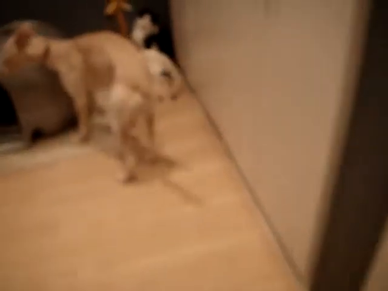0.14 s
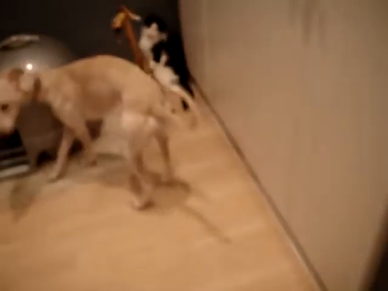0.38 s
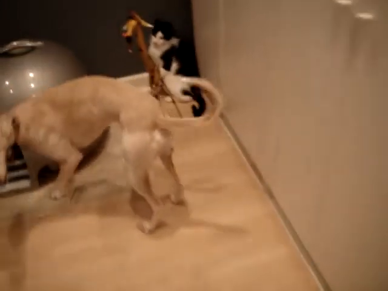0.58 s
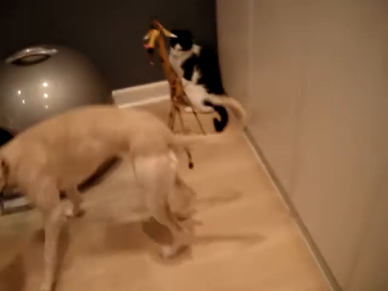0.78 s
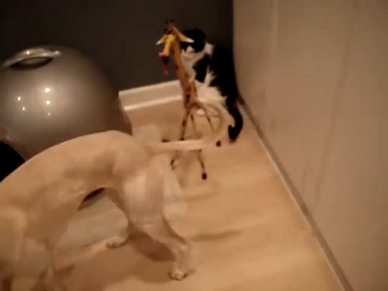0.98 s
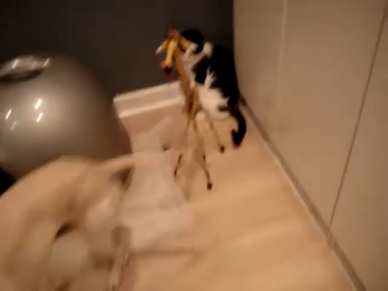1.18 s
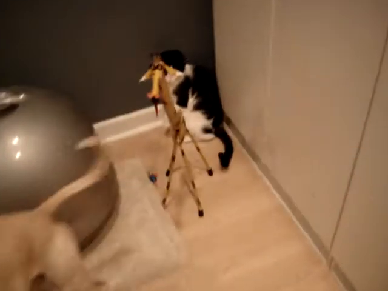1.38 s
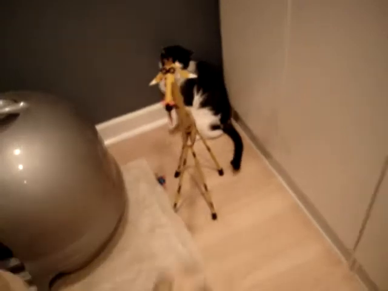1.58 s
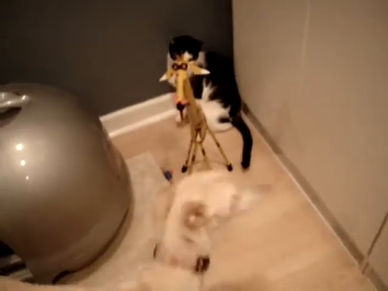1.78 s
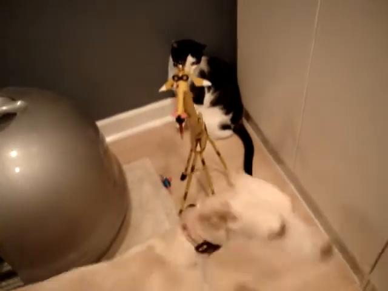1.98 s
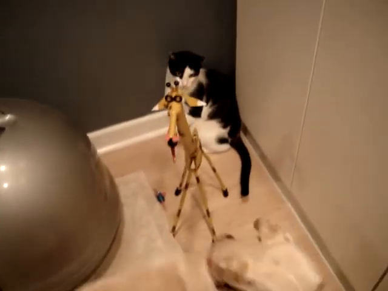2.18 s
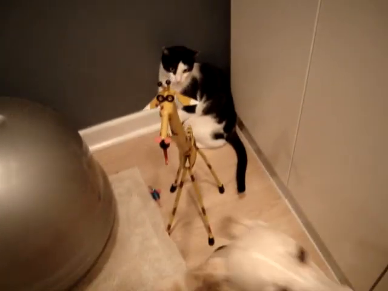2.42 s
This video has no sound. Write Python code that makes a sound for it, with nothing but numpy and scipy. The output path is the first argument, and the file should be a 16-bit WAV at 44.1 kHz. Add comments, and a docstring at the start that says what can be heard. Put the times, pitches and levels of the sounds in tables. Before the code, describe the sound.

Dog claws click sparsely on laminate while a metal collar tag jingles, then scrabble into a louder, dense burst of scrapes, skids and paw thumps before quieting; small, bright room, one microphone, mono.

```python
"""Dogs scrabbling on laminate

Two dogs scrabble round a cat and its toy on a laminate floor in a small, bare room. Claws tick, scrape
and skid in a quick dash, all as runs of stick-slip clicks; pads slap and scuff the same way, duller.
Paws and bodies bump the boards into low damped modes, and a metal collar tag tinkles in high ones.
Faint tones linger, weight shifts rumble, and shaped noise lies beneath as room tone and low rumble.
The contacts and the tag carry the room's short, bright echo."""
import sys
import numpy as np
from scipy import signal
from scipy.fft import rfft, irfft, next_fast_len
from scipy.io import wavfile

SR = 44100
rng = np.random.default_rng(int(sys.argv[2]) if len(sys.argv) > 2 else 0)


def store_pcm(level_fs):
    """Save levels as 16-bit WAV."""
    pcm = np.round(np.clip(level_fs, -1, 1) * 32767).astype(np.int16)
    wavfile.write(sys.argv[1], SR, np.atleast_2d(pcm).T)


N = 108045
TIME = np.arange(N) / SR
CUTOFF_HZ = 10100


def from_db(db):
    """Decibels to gain."""
    return 10 ** (np.asarray(db) / 20)


def rms_one(x):
    """Scale to an rms of 1."""
    return x / np.sqrt(np.mean(x ** 2) + 1e-20)


def at_hz(points, hz):
    """Read a table on a log-frequency axis."""
    table_hz, values = np.array(points).T
    return np.interp(np.log(hz), np.log(table_hz), values)


def level(points):
    """Gain over time from (t/s, level/dB) rows."""
    return from_db(np.interp(TIME, *np.transpose(points)))


def add(out, s, sound):
    """Mix a sound in at a time in seconds."""
    i = max(int(s * SR), 0)
    out[i:i + len(sound)] += sound[:N - i]


def sine(hz, t):
    """A steady tone that starts at a random phase."""
    return np.sin(2 * np.pi * (hz * t + rng.random()))


def colour(x, points, tilt_db=0, ring_hz=5000, ring_db=0, ring_width_hz=220):
    """Causal (minimum-phase) filter of unit power: a spectrum, a tilt per octave and one resonance."""
    size = 2 * next_fast_len(len(x))
    half = size // 2
    hz = np.arange(half + 1) * SR / size + 1e-3
    tilt = tilt_db * np.log2(np.clip(hz / ring_hz, .1, 2))  # flattens an octave above the ring
    ring = ring_db / (1 + ((hz - ring_hz) / ring_width_hz) ** 2)
    top_cut = np.sqrt(1 + (hz / CUTOFF_HZ / 1.1) ** 20)
    gain = rms_one(from_db(at_hz(points, hz) + tilt + ring) / top_cut)
    # folding the cepstrum forward in time keeps pre-ringing off the attacks
    cepstrum = irfft(np.log(gain + 1e-6))
    cepstrum[1:half] *= 2
    cepstrum[half + 1:] = 0
    return irfft(rfft(x, size) * np.exp(rfft(cepstrum)))[:len(x)]


SLIP_SPREAD_DB = 3  # scale of the random boost per slip


def slips(per_s, count, chatter_db, chatter_s):
    """Stick-slip clicks of uneven size, clumped as the grip comes and goes; rms 1."""
    sizes = from_db(SLIP_SPREAD_DB * np.minimum(rng.exponential(1, count), 3.5))
    knots = count // 40
    grip_time = np.arange(count) / SR / max(chatter_s, .001)
    grip = np.interp(grip_time, np.arange(knots), rng.uniform(-1, 1, knots))
    happens = rng.random(count) < per_s / SR
    return rms_one(happens * sizes * from_db(chatter_db * grip) * rng.choice([-1, 1], count))


SLIPS_PER_S, DRAG_FADE_DB = 4500, 11.5
CHATTER_DB, CHATTER_S = 7, 0.0063  # swing of the grip each way, time scale


def drag(attack_s, length_s, size=8192):
    """One contact: a run of slips that sets in, fades and breaks off."""
    t = np.arange(size) / SR
    length_s = max(length_s, .003)
    run = slips(SLIPS_PER_S, size, CHATTER_DB, CHATTER_S)
    run = run * (1 - np.exp(-t / max(attack_s, 1e-4)))
    fade = from_db(-DRAG_FADE_DB * (t / length_s) ** 2)
    break_off = 1 + (t / length_s) ** 10
    # energy grows with length, so a level means the loudness during the contact
    return rms_one(run * fade / break_off) * np.sqrt(length_s * SR / size)


def scrapes(rows, spectrum, ring_width_hz):
    """Each claw or pad lands and drags, with a brightness and a ring of its own."""
    out = np.zeros(N)
    for s, db, attack_s, length_s, tilt_db, ring_hz, ring_db in rows:
        contact = drag(attack_s, length_s)
        add(out, s, from_db(db) * colour(contact, spectrum, tilt_db, ring_hz, ring_db, ring_width_hz))
    return out


def rubs(rows, spectrum, attack_s):
    """Soft runs of slips, all of one colour, from (t/s, level/dB, length/s) rows."""
    out = np.zeros(N)
    for s, db, length_s in rows:
        add(out, s, from_db(db) * drag(attack_s, length_s))
    return colour(out, spectrum)


# Decay of the bare room, longest in the upper mids: f/Hz, t60/s
ROOM_DECAY = [(200, 0.28), (1000, 0.18), (4000, 0.34), (9000, 0.13)]


def room(x, size=26000):
    """A diffuse echo: bands of noise, each dying at its own rate, as one unit-energy response."""
    t, tail = np.arange(size) / SR, 0
    edges = np.geomspace(80, 12000, 9)
    for low, high in zip(edges, edges[1:]):
        band_pass = signal.butter(2, [low, high], "band", fs=SR, output="sos")
        band = signal.sosfilt(band_pass, rng.standard_normal(size))
        tail = tail + band * from_db(-60 * t / at_hz(ROOM_DECAY, np.sqrt(low * high)))
    return signal.fftconvolve(x, rms_one(tail) / np.sqrt(size))[:N]


# Level of the room background: holds fairly even, then drops sharply after 2 s: t/s, level/dB
ROOM_TONE_LEVEL = [(0, -47.5), (0.4, -47), (0.8, -46), (1.25, -46), (1.38, -50.5), (1.6, -48.5),
                   (2.0, -47.5), (2.12, -58), (2.3, -59), (2.45, -60.5)]
# Its spectrum: f/Hz, level/dB
ROOM_TONE_COLOUR = [(25, -0.5), (60, -9.5), (110, -4.5), (170, 0), (250, -2.5), (355, 4.5), (520, -1),
                    (1000, -2), (1750, -5), (2100, -5.5), (2300, -6.5), (2530, -5.5), (2800, -10.5),
                    (6000, -5.5), (10000, -13.5)]


def room_tone():
    """Noise with the room's spectrum, fairly even in level until it drops sharply after 2 s."""
    return level(ROOM_TONE_LEVEL) * colour(rng.standard_normal(N), ROOM_TONE_COLOUR)


FLOOR_RUMBLE_DB = -68.5
# Spectrum of the low rumble, shared with the weight shifts below: f/Hz, level/dB
LOW_COLOUR = [(15, -1.5), (32, -7.5), (70, -12), (150, -22.5), (500, -48)]


def floor_rumble():
    """Constant low rumble of the building, as dark noise."""
    return from_db(FLOOR_RUMBLE_DB) * colour(rng.standard_normal(N), LOW_COLOUR)


# Weight shifting on the floor: t/s, level/dB, length/s
WEIGHT_SHIFTS = [(0.175, -55, 0.071), (0.74, -52.5, 0.085), (1.35, -50, 0.025), (1.52, -53.5, .045)]


def weight_shifts():
    """Shifting weight gives short bursts of slips, darkened to a dull rumble."""
    return rubs(WEIGHT_SHIFTS, LOW_COLOUR, attack_s=.004)


# Something jostled rings on faintly: t/s, level/dB, f/Hz, t60/s
LINGERING_TONES = [(0.222, -38, 3820, 0.23), (0.661, -56, 2436, 0.81), (0.991, -54, 2536, 0.68),
                   (1.04, -56, 2220, 0.67), (2.345, -48, 3880, 0.31)]


def rings(swell_s=0.0029):
    """Thin tones that swell in fast and die exponentially after a jolt."""
    out, t = np.zeros(N), TIME[:SR]
    for s, db, hz, t60 in LINGERING_TONES:
        envelope = from_db(db - 60 * t / t60) * (1 - np.exp(-t / swell_s))
        add(out, s, envelope * np.sin(2 * np.pi * hz * t))
    return out


# A paw or body bumps the floor and what stands on it:
# t/s, level/dB, length/s, main resonance f/Hz, higher modes' level/dB, puff level/dB (both relative)
BODY_BUMPS = [(0.001, -44, 0.011, 175, -3, -17), (0.18, -44.5, 0.1, 392.6, -11, -5.5),
              (0.575, -46.5, 0.012, 160, -4.5, -2), (0.744, -48.5, 0.084, 375, -7, -1.5),
              (0.878, -49.5, 0.017, 407, 4.5, -12), (1.143, -48.5, 0.017, 162, -2.5, -5),
              (1.325, -48, 0.011, 328, -3, 4), (1.485, -27, 0.048, 325, -1, -15.5),
              (1.525, -39.5, 0.024, 349, -16, -16), (1.658, -27.5, 0.018, 479.5, 0.5, -9),
              (1.704, -54, 0.022, 234, 1, 6), (1.845, -46, 0.076, 218, 1, -18),
              (1.97, -48.5, 0.14, 165, -4, -22)]
# Modes of the boards: multiple of the main resonance, level/dB, t60/s
BOARD_MODES = [(1, -3, 0.056), (1.18, -16.5, 0.036), (1.42, -8, 0.063), (2.08, -14, 0.064)]
# Spectrum of the dull puff: f/Hz, level/dB
PUFF_COLOUR = [(40, -25), (120, -2), (230, -5.5), (330, 8.5), (700, -1.5), (1200, -19), (3000, -19.5)]


def bumps(swell_s=0.0016, size=16000):
    """A soft blow sets low modes ringing while it presses, over a dull puff."""
    out, t = np.zeros(N), np.arange(size) / SR
    for s, db, length_s, main_hz, higher_db, _ in BODY_BUMPS:
        after_press = np.maximum(t - length_s / 2, 0)
        for k, (multiple, mode_db, t60) in enumerate(BOARD_MODES):
            envelope = (1 - np.exp(-t / swell_s)) * from_db(-60 * after_press / t60)
            gain = from_db(db + mode_db + higher_db * (k > 0))
            add(out, s, gain * envelope * sine(main_hz * multiple, t))
    puffs = [(s, db + puff_db, length_s) for s, db, length_s, _, _, puff_db in BODY_BUMPS]
    return out + rubs(puffs, PUFF_COLOUR, attack_s=0.0042)


# A pad slaps or scuffs the boards:
# t/s, level/dB, attack/s, length/s, brightness/dB per octave, ring f/Hz, ring level/dB
PAD_SCUFFS = [(0.18, -47, .002, 0.045, -11.5, 590, 3), (0.74, -50.5, 0.0044, 0.064, -11, 1410, 9),
              (0.872, -50.5, 0.0024, 0.022, -10.5, 690, 12), (1.471, -31.5, 0.00014, 0.0067, -5, 1210, 5),
              (1.478, -35.5, 0.0022, 0.061, -4, 1180, 3.5),
              (1.638, -28.5, 0.0002, 0.0053, -1.5, 1140, 15.5), (1.643, -36, 0.002, 0.014, 1, 1150, 0),
              (1.657, -38, 0.0017, 0.044, -2, 600, 13), (1.704, -37.5, .003, 0.053, 1.5, 2450, 9),
              (1.807, -35, 0.00055, 0.026, 3.5, 2320, 5), (1.841, -38.5, 0.0021, 0.11, 0, 2260, -3)]
# Spectrum of a pad: f/Hz, level/dB
PAD_COLOUR = [(150, -29.5), (500, -18.5), (800, 3.5), (1150, 4.5), (1450, 3), (1800, -1.5), (2400, 5.5),
              (3200, 7), (6000, -12)]


def scuffs():
    """Pads slip on the boards, each contact with a narrow ring in the lows or mids."""
    return scrapes(PAD_SCUFFS, PAD_COLOUR, ring_width_hz=114)


# The collar tag strikes its ring: t/s, ceiling level/dB
TAG_STRIKES = [(0.3466, -26.5), (0.364, -29.5), (0.706, -16), (0.7133, -11.5), (0.735, -16.5), (0.748, -43),
               (0.76, -25), (0.765, -56), (0.772, -27.5), (0.788, -60)]
# Modes of the metal tag: f/Hz, level/dB, t60/s
METAL_MODES = [(2379, -36, .4), (5577, -29, .22), (6487, -32, .35), (9098, -21, .08), (9383, -20, .08),
               (9518, 0, .16), (9706, -22, .08), (9916, -22, .08)]


def tag_hits(uneven_db=2, size=16000):
    """Every touch stops the tag's ring and starts it afresh, each mode with a new strength."""
    out, t = np.zeros(N), np.arange(size) / SR
    next_strikes = TAG_STRIKES[1:] + [(N / SR, 0)]
    for (s, db), (next_s, _) in zip(TAG_STRIKES, next_strikes):
        # 1 ms fades: in at this touch, out from the next
        free = np.clip((next_s - s - t) / .001 + 1, 0, 1) * np.minimum(t / .001, 1)
        for hz, mode_db, t60 in METAL_MODES:
            weaker_db = uneven_db * (2 * rng.random() - 2)  # from 0 down to twice uneven_db
            strength = from_db(db + mode_db + weaker_db - 60 * t / t60)
            add(out, s, free * strength * sine(hz, t))
    return out


# The tag rattles lightly along its ring: t/s, level/dB, length/s
RATTLES = [(0.192, -44.5, 0.07), (0.35, -38.5, 0.067), (0.405, -42, 0.036), (0.4655, -39, 0.045),
           (0.5, -43.5, 0.066), (0.706, -27, 0.025), (0.808, -42.5, 0.038), (0.845, -43, 0.16),
           (1.25, -37.5, 0.049), (1.28, -37.5, 0.05), (2.288, -49, 0.024)]
# Spectrum of the rattle: f/Hz, level/dB
RATTLE_COLOUR = [(5000, -47), (8600, -34.5), (9200, -18.5), (9520, -2.5), (9750, -7), (10100, -25.5)]


def tag_rattles():
    """Runs of tiny metal contacts, filtered to the tag's high ring."""
    return rubs(RATTLES, RATTLE_COLOUR, attack_s=0.0013)


SKID_SLIPS_PER_S = 5000
SKID_CHATTER_DB, SKID_CHATTER_S = 8.5, 0.011  # a claw catches and lets go: swing each way, time scale
SKID_HANDOVER_S, SKID_PITCH_SPREAD = 0.01, 0.06  # mean time per claw; relative spread of pitch each way
# Claws skid under the separate scrapes during the dash: t/s, level/dB
SKID_LEVEL = [(1.24, -50), (1.325, -30.5), (1.36, -48), (1.378, -58), (1.39, -29.5), (1.44, -29.5),
              (1.55, -24.5), (1.558, -24), (1.585, -34), (1.62, -28), (1.7, -33.5), (1.76, -28),
              (1.82, -76), (1.92, -36.5), (2.04, -37), (2.08, -35.5), (2.15, -33.5), (2.2, -41),
              (2.25, -57)]
# Spectrum of a skidding claw, before the pitch spread: f/Hz, level/dB
SKID_SPECTRUM = [(200, -41.5), (1000, -21), (2500, -22), (3500, -11.5), (4600, -11.5), (5600, -11.5),
                 (6600, 0), (7400, -11.5), (8400, 3), (9000, -2), (10000, -6)]


def skid(count=4):
    """Claws slide in a dense stream of slips, taking turns, each with its own pitch."""
    stream = level(SKID_LEVEL) * slips(SKID_SLIPS_PER_S, N, SKID_CHATTER_DB, SKID_CHATTER_S)
    handovers = rng.random(N) < 1 / (SKID_HANDOVER_S * SR)
    bearing = np.cumsum(handovers) % count  # which claw takes the weight
    pitches = 1 + SKID_PITCH_SPREAD * rng.permutation(np.linspace(-1, 1, count))
    out = np.zeros(N)
    for k, pitch in enumerate(pitches):
        spectrum = [(hz * pitch, db) for hz, db in SKID_SPECTRUM]
        out += colour(stream * (bearing == k), spectrum)
    return out


# A claw lands and drags:
# t/s, level/dB, attack/s, drag length/s, brightness/dB per octave, ring f/Hz, ring level/dB
CLAW_SCRAPES = [(0.001, -36, 0.00028, 0.0099, -3, 4100, 4.5), (0.1795, -44, 0.0003, 0.011, -7.5, 3980, 3),
                (0.221, -40.5, 0.0038, 0.06, -1.5, 3700, 6.5), (0.494, -43, 0.0083, 0.04, -6, 4200, 7.5),
                (0.535, -42.5, 0.0056, 0.024, -9, 4050, 12.5), (0.5763, -26, .0002, 0.0046, -1, 4460, 4),
                (0.5815, -35.5, 0.0012, 0.032, -0.5, 3820, 8.5),
                (0.909, -38.5, 0.0025, 0.017, -2.5, 4100, 10), (0.938, -32.5, 0.0045, 0.013, -3, 3660, 6),
                (1.096, -39.5, 0.0018, 0.023, -3.5, 4500, -2), (1.145, -31, 0.001, 0.021, -0.5, 5100, 4.5),
                (1.195, -38.5, 0.0047, 0.061, 2, 3700, 11), (1.319, -26.5, 0.0055, 0.036, 4, 8300, 9.5),
                (1.348, -19, 0.001, 0.008, 1, 6570, 14), (1.356, -18.5, 0.00077, 0.012, 3, 6700, 13),
                (1.383, -33.5, 0.0012, 0.055, 1, 8300, 11), (1.459, -24.5, .002, 0.027, 9.5, 8400, 0),
                (1.482, -22, 0.002, 0.011, -4, 4920, 20), (1.492, -35.5, 0.002, 0.046, -4.5, 4700, 6),
                (1.533, -24.5, 0.0028, 0.014, -0.5, 8600, -0.5), (1.566, -28.5, 0.0024, 0.033, 2, 8300, 5),
                (1.657, -24.5, 0.0053, 0.016, -3.5, 4940, 12.5),
                (1.708, -24.5, 0.0033, 0.026, -0.5, 9200, 8.5), (1.839, -22, .0005, 0.029, 1, 5800, 4.5),
                (1.877, -24.5, 0.0027, 0.057, 1, 6400, 2.5), (1.992, -30.5, 0.016, 0.017, -2, 5400, 8),
                (2.105, -35, 0.0071, 0.079, 3.5, 6750, -18), (2.341, -43, 0.0016, 0.086, -0.5, 3860, 1.5),
                (2.375, -47.5, 0.007, 0.073, -1.5, 4200, 7)]
# Spectrum of a claw: f/Hz, level/dB
CLAW_SPECTRUM = [(100, -34.5), (300, -33.5), (700, -22), (1200, -17), (2000, -14.5), (3000, -12),
                 (4500, -3.5), (6500, -3.5), (8300, -1.5), (10000, -5.5)]


def claws():
    """Hard claws tick and scrape the laminate in runs of slips, each with its own high resonance."""
    return scrapes(CLAW_SCRAPES, CLAW_SPECTRUM, ring_width_hz=370)


CLOSE_S, ROOM_FADE_DB = 1.2, 7  # the dogs come close: from here the claws' echo send is this much lower


def scene():
    """All the sources, each contact and the tag with its own echo, picked up by one microphone."""
    claw_room_db = 1 - ROOM_FADE_DB * (TIME > CLOSE_S)
    # source, echo send/dB
    sources = [(claws(), claw_room_db), (skid(), -2), (scuffs(), -5.5), (bumps(), -6.5),
               (tag_hits() + tag_rattles(), -28.5)]
    animals = sum(sound + room(from_db(room_db) * sound) for sound, room_db in sources)
    animals = animals + weight_shifts()
    mono = animals + rings() + room_tone() + floor_rumble()
    return np.array([mono, mono])


def record(dry):
    """The top is cut steeply by an elliptic low-pass."""
    low_pass = signal.ellip(12, .2, 70, CUTOFF_HZ, fs=SR, output="sos")
    return signal.sosfilt(low_pass, dry)


dry = scene()
out = record(dry)
store_pcm(out)
```